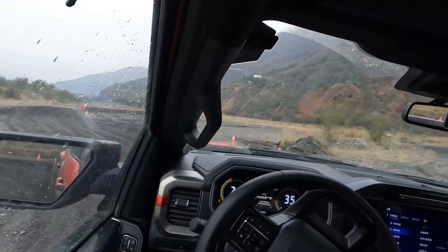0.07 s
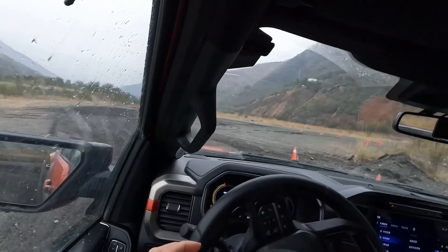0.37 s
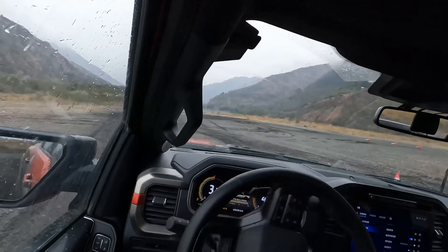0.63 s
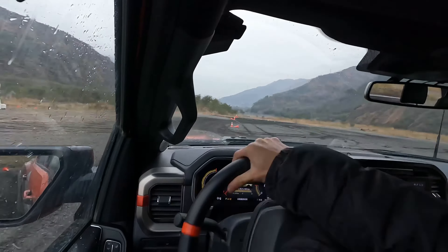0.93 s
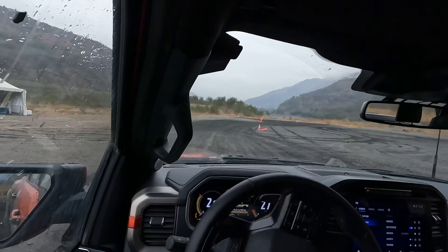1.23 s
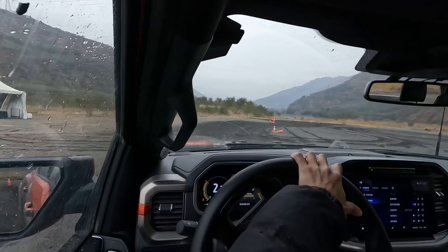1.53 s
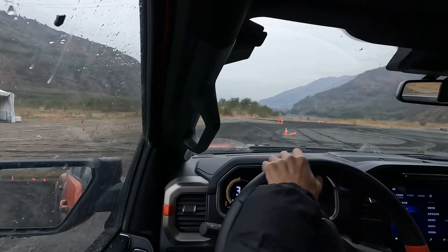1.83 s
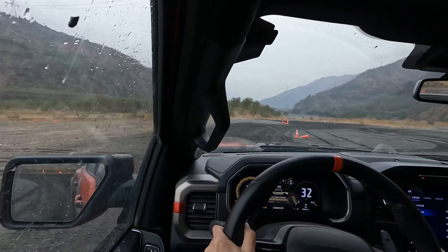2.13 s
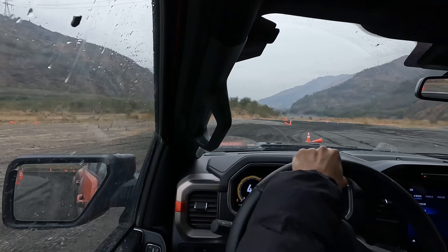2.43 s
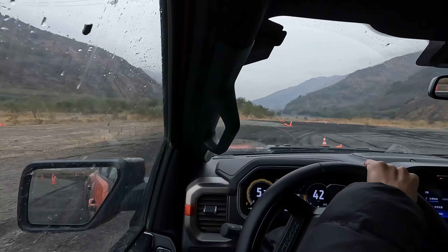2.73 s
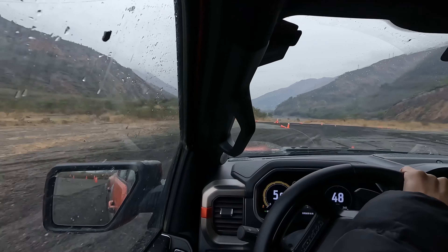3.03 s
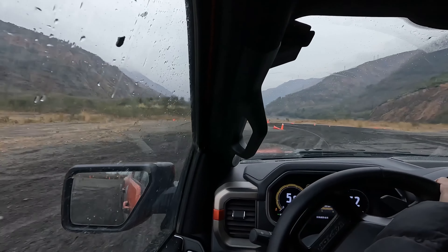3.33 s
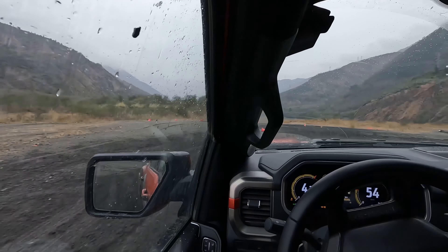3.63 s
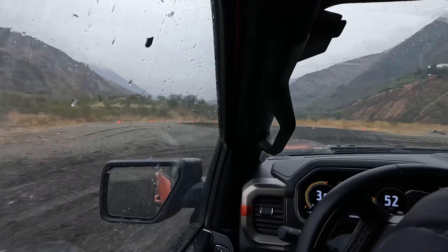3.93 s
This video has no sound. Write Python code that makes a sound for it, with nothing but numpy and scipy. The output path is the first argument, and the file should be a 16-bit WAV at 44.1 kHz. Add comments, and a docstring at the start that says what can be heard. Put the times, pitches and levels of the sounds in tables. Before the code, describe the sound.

Inside the cabin, a hard-driven truck engine dips, climbs to high revs and falls back with a shift. Rough ground booms below it, with a few suspension thumps, faint wet grit spraying and stones knocking in the wheel wells.

```python
"""A six-cylinder truck engine, heard from inside as it is driven hard over loose wet gravel.
Its firing cylinders make a stack of notes that pulls, sags in a turn, revs up and drops at a shift.
Under it, rough ground makes the cabin boom and the tires rumble, and ruts thump the suspension.
Wet grit sprays the underside, pebbles tick, stones clatter, and one cracks against the body."""
import sys
import numpy as np
from scipy import signal
from scipy.fft import rfft, irfft
from scipy.io import wavfile
from scipy.ndimage import uniform_filter1d, minimum_filter1d

SR = 44100
rng = np.random.default_rng(int(sys.argv[2]) if len(sys.argv) > 2 else 0)


def transcribe(signal):
    """Save signal, clipped to [-1, 1], as a 16-bit WAV file at the path in sys.argv[1]."""
    frames = np.atleast_2d(signal).T
    limited = np.clip(frames, -1, 1)
    pcm = np.round(limited * 32767).astype(np.int16)
    wavfile.write(sys.argv[1], SR, pcm)


N = 176400
T = np.arange(N) / SR


def amp(db):
    """Turns decibels into a gain."""
    return 10 ** (np.asarray(db) / 20)


def unit(x):
    """Scales a sound to an average (rms) level of 1."""
    return x / np.sqrt(np.mean(x ** 2) + 1e-20)


def curves(table):
    """Joins the rows of a timed table with straight lines, one curve per column."""
    times, *columns = np.transpose(table)
    return [np.interp(T, times, column) for column in columns]


def colour(x, points):
    """Makes some frequencies stronger than others; the result has level 1."""
    octave = np.log2(np.fft.rfftfreq(len(x), 1 / SR) + 1)
    hz, db = np.transpose(points)
    return unit(irfft(rfft(x) * amp(np.interp(octave, np.log2(hz), db)), len(x)))


def band(x, centre_hz, octaves):
    """Keeps a bell-shaped band of frequencies; the result has level 1."""
    hz = np.fft.rfftfreq(len(x), 1 / SR) + 1
    bell = np.exp(-.5 * (np.log2(hz / centre_hz) / octaves) ** 2)
    return unit(irfft(rfft(x) * bell / np.sqrt(hz), len(x)))


def drift(hz):
    """A random wobble, up to about hz times a second."""
    f = np.fft.rfftfreq(N, 1 / SR)
    return unit(irfft(rfft(rng.standard_normal(N)) * np.exp(-(f / hz) ** 2), N))


def ring(tones, t):
    """A struck part rings with a few tones that die away."""
    return sum(amp(db) * 1000 ** (-t / fade_s) * np.sin(2 * np.pi * (hz * t + rng.random()))
               for hz, db, fade_s in tones)


def add(mix, start, sound):
    """Mixes a sound in at a start time in seconds."""
    part = mix[max(round(start * SR), 0):][:len(sound)]
    part += sound[:len(part)]


# Noise from the ground. Each row: time in seconds, relative boom and rumble levels in dB.
ROAD_LEVELS = [(0.0, -17.5, -30), (0.34, -17.5, -27.5), (0.4, -15, -33.5), (0.58, -29, -21.5),
               (0.66, -15, -27.5), (1.4, -22.5, -28), (1.86, -27.5, -30), (2.72, -16.5, -28),
               (2.85, -17.5, -24.5), (4.0, -29, -38)]
# The tone of the boom and of the rumble. Each row: frequency in Hz, relative level in dB.
BOOM_TONE = [(4, -39.5), (22, 4.5), (35, -7.5), (48, -12.5), (90, -46), (300, -102.5)]
RUMBLE_TONE = [(20, -26), (48, 1.5), (72, 5), (110, -2.5), (160, -7), (230, -10), (320, -17.5), (450, -29),
               (700, -37.5), (2000, -81.5)]
def road():
    """Rough ground shakes the cabin air and rumbles through the tires."""
    boom_db, rumble_db = curves(ROAD_LEVELS)
    boom = amp(boom_db + 7) * colour(rng.standard_normal(N), BOOM_TONE)
    rumble = amp(rumble_db + 2.5) * colour(rng.standard_normal(N), RUMBLE_TONE)
    return boom + rumble


def grains(per_second=1500, spread_db=2.5, click_share=0.33):
    """Countless small hits of uneven size over a smooth hiss."""
    size = amp(spread_db * np.minimum(rng.exponential(1, N), 4))
    clicks = size * rng.choice([-1, 1], N) * (rng.random(N) < per_second / SR)
    return np.sqrt(click_share) * unit(clicks) + np.sqrt(1 - click_share) * rng.standard_normal(N)


# Gravel under the tires. Each row: time in seconds, relative crunch and grit levels in dB.
GRAVEL_LEVELS = [(0.03, -58.5, -65), (0.45, -55.5, -60.5), (0.53, -51.5, -56.5), (0.67, -51, -53.5),
                 (0.87, -46, -50), (1.08, -50, -53.5), (1.6, -60, -63), (1.97, -58, -64), (2.15, -53, -59),
                 (2.45, -48.5, -60), (2.79, -52, -57.5), (3.1, -53, -60.5), (3.58, -59, -64.5),
                 (3.8, -60.5, -69.5), (3.97, -67.5, -75)]
# The tone of each gravel layer. Each row: frequency in Hz, relative level in dB.
CRUNCH_TONE = [(100, -15), (300, 5), (450, 8), (600, 1), (780, 1), (1400, -8), (2000, -19.5), (5000, -43.5)]
GRIT_TONE = [(500, -31.5), (1200, 2.5), (2100, 1.2), (4100, -5.5), (5200, -8.5), (8000, -17.5),
             (14000, -52.5)]
SPRAY_TONE = [(2000, -26), (4500, -2.5), (6700, -0.5), (8500, -4), (11000, -12), (12500, -4.5),
              (15500, -23)]
def gravel():
    """Coarse crunch, finer grit and wet spray, all arriving in the same clumps."""
    crunch_db, grit_db = curves(GRAVEL_LEVELS)
    clumps = amp(1.56 * drift(hz=29))
    crunch = amp(crunch_db + 4) * colour(grains(), CRUNCH_TONE)
    grit = amp(grit_db + 0.5) * colour(grains(), GRIT_TONE)
    spray = amp(grit_db - 12) * colour(grains(), SPRAY_TONE)
    return clumps * (crunch + grit + spray)


# Sheets of wet gravel. Each row: start and length in seconds, level in dB, centre in Hz,
# width in octaves.
FLUNG_SHEETS = [(0.253, 0.06, -51, 6000, 1), (0.651, 0.1, -53.5, 4380, .9), (0.959, 0.092, -52, 5500, 0.55),
                (0.946, 0.072, -59, 12800, 0.12), (1.169, 0.086, -45.5, 1080, 0.81),
                (1.383, 0.11, -64.5, 6500, 0.61), (1.93, 0.28, -63.5, 4970, 0.8),
                (2.835, 0.071, -59, 4500, 0.84), (2.942, 0.055, -61, 5500, 0.62)]
def flings():
    """The tread throws gravel at the wheel wells in brief swells."""
    out = np.zeros(N)
    for start, length, db, centre_hz, octaves in FLUNG_SHEETS:
        swell = np.hanning(round(length * SR))
        patter = band(grains()[:SR // 2], centre_hz, octaves)
        add(out, start, amp(db) * swell * patter[:len(swell)])
    return out


# Pebble hits. Each row: start in seconds, level in dB, centre in Hz, width in octaves.
PEBBLE_HITS = [(0.111, -58, 4000, 0.67), (.158, -52, 2490, 0.8), (0.254, -45.5, 1640, 0.71),
               (.459, -55.5, 2123, 0.15), (.517, -49, 1970, 1.0), (.556, -56, 4900, 0.53),
               (.748, -43.5, 1970, 0.63), (.793, -44.5, 4200, 0.72), (0.891, -48, 2243, 0.16),
               (.973, -52, 6660, 0.061), (1.008, -58, 5350, .12), (1.402, -49.5, 1797, 0.58),
               (1.515, -55.5, 2730, 0.88), (2.087, -52, 2039, 0.26), (2.645, -54.5, 2400, 0.55),
               (2.803, -49, 700, .4), (3.334, -55, 2940, 0.68)]
def pebbles(peak_s=.006):
    """Pebbles tick on the underside, each with a soft attack."""
    out, t = np.zeros(N), T[:SR // 10]
    envelope = t / peak_s * np.exp(1 - t / peak_s)
    for start, db, centre_hz, octaves in PEBBLE_HITS:
        add(out, start, amp(db) * envelope * band(rng.standard_normal(len(t)), centre_hz, octaves))
    return out


# Stones hitting a wheel well. Each row: start in seconds, level in dB.
RATTLE_HITS = [(.801, -33), (1.074, -44.5), (1.098, -41), (1.213, -42), (2.213, -35.5), (2.23, -36.5),
               (2.281, -42.5), (2.326, -44), (2.366, -42), (2.525, -45), (2.558, -39.5), (2.87, -44.5)]
# The tone of the wheel well. Each row: frequency in Hz, relative level in dB.
WELL_TONE = [(300, -11), (750, 7), (1050, 0.5), (1500, -1), (1850, -13), (6000, -39.5)]
def rattles(rise_s=.0004, decay_s=.01):
    """Larger stones clatter in a wheel well, each with the same hollow tone."""
    out, t = np.zeros(N), T[:SR // 10]
    envelope = np.minimum(t / rise_s, 1) * np.exp(-t / decay_s)
    for start, db in RATTLE_HITS:
        add(out, start, amp(db) * envelope * colour(rng.standard_normal(len(t)), WELL_TONE))
    return out


# The tone of the crack. Each row: frequency in Hz, relative level in dB.
CRACK_TONE = [(400, 5), (4200, -3), (5200, -8), (8000, -18), (10300, -14), (13500, -29), (15500, -30)]
# The ringing panel. Each row: pitch in Hz, relative level in dB, seconds to fade by 60 dB.
PANEL_RING = [(450, -5, .025), (560, -11, .08), (730, 1, .03), (1400, -7.5, .024), (2100, -1.5, .025),
              (2751, -16, .045), (3370, -5, .025), (3900, -4, .015), (6702, -28, .13)]
def stone(start=.2811, db=-26.5, rise_s=.0004, decay_s=.0022, cabin_decay_s=.014):
    """One stone cracks against a near panel, which rings briefly into the cabin."""
    out, t = np.zeros(N), T[:SR // 4]
    fade = np.exp(-t / decay_s) + amp(-25) * np.exp(-t / cabin_decay_s)
    crack = fade * colour(rng.standard_normal(len(t)), CRACK_TONE)
    add(out, start, amp(db) * np.minimum(t / rise_s, 1) * (crack + ring(PANEL_RING, t)))
    return out


# Ruts in the road. Each row: start in seconds, relative level in dB.
RUTS = [(.495, -15.5), (.805, -19.5), (.87, -24.5), (2.215, -22.5)]
# The ringing frame. Each row: pitch in Hz, relative level in dB, seconds to fade by 60 dB.
FRAME_RING = [(157, 5.5, 0.17), (231, -1.5, 0.15), (328.3, -10.5, 0.14), (398.6, -10.5, 0.11),
              (541, -17, 0.11)]
def thumps(rise_s=.004):
    """Ruts knock the suspension and set the truck's frame ringing."""
    out, t = np.zeros(N), T[:SR // 4]
    for start, db in RUTS:
        add(out, start, amp(db) * np.minimum(t / rise_s, 1) * ring(FRAME_RING, t))
    return out


# Engine speed. Each row: time in seconds, firings per second of one bank of three cylinders.
ENGINE_SPEED = [(0.0, 70.77), (0.15, 72.5), (0.73, 88.03), (0.86, 77.53), (1.01, 55.98), (1.11, 50.07),
                (1.3, 48.5), (1.45, 54.36), (1.68, 76.34), (1.8, 91.32), (2.33, 111), (2.84, 146.1),
                (3.05, 150.5), (3.19, 146), (3.28, 129.3), (3.4, 113.3), (3.55, 100), (4.0, 96.3)]
# The note of all six cylinders firing. Each row: time in seconds, level in dB.
FIRING_LEVEL = [(0, -32), (.18, -25.5), (.35, -29), (.65, -26.5), (.9, -29), (1.07, -23.5), (1.12, -33),
                (1.39, -35), (1.47, -22.5), (1.62, -30.5), (1.7, -22), (1.77, -35), (1.83, -27.5),
                (2.2, -34), (2.63, -25), (2.73, -43), (2.97, -32.5), (3.19, -37.5), (3.35, -22.5),
                (3.75, -40.5), (4.0, -60.5)]
# The exhaust note of one bank, an octave lower. Each row: time in seconds, level in dB.
BANK_LEVEL = [(0, -52.5), (1.72, -40), (1.88, -24.5), (2.55, -26), (2.72, -33), (2.98, -24), (3.2, -30.5),
              (3.33, -21), (3.7, -40)]
# Weaker notes from uneven cylinders. Each row: multiple of the cycle rate, relative level in dB.
WEAK_NOTES = [(4, -1), (5, -9), (7, -6.5), (8, -10.5), (10, -13.5), (11, -17), (12, -23.5), (14, -24),
              (15, -26.5), (18, -30.5)]
# How hard the engine pulls. Each row: time in seconds, relative level of the weaker notes in dB.
ENGINE_PULL = [(0, -43.5), (.7, -36.5), (1.1, -28.5), (1.7, -36.5), (2.3, -29), (2.55, -30.5),
               (2.72, -36.5), (3.0, -34), (3.4, -37.5), (3.9, -53.5)]
# How the cabin shapes the upper and weaker notes. Each row: frequency in Hz, boost or cut in dB.
CABIN_TONE = [(245, -3.5), (290, -7.5), (320, -2), (345, -5.5), (370, 2.5), (408, -11.5), (455, 1),
              (490, -1), (600, -14), (745, 5.5), (900, -15)]
def engine(stumble=0.0064, steady_hz=97, flutter_hz=29.5, flutter_db=0.17, weak_flutter_db=4.5):
    """Three strong notes and many weaker ones follow the crankshaft, which stumbles at low speed."""
    bank_hz, firing_db = curves(ENGINE_SPEED) + curves(FIRING_LEVEL)
    bank_db, pull_db = curves(BANK_LEVEL) + curves(ENGINE_PULL)
    cycle_hz = bank_hz / 3  # each cylinder fires once per cycle
    wobble = stumble * (steady_hz / bank_hz) ** 2 * drift(hz=29.3)
    cycles = np.cumsum(cycle_hz * (1 + wobble)) / SR
    cabin_db = lambda multiple: np.interp(multiple * cycle_hz, *np.transpose(CABIN_TONE))
    upper_db = firing_db - 10 + cabin_db(9)
    levels = [(3, bank_db), (6, firing_db), (9, upper_db)]
    for multiple, db in WEAK_NOTES:
        flicker_db = weak_flutter_db * drift(flutter_hz)
        levels.append((round(multiple), pull_db + db + cabin_db(multiple) + flicker_db))
    notes = sum(np.sqrt(2) * amp(db) * np.sin(2 * np.pi * (multiple * cycles + rng.random()))
                for multiple, db in levels)
    return amp(flutter_db * drift(flutter_hz)) * notes


def scene():
    """Everything as heard from the driver's seat, in one channel."""
    return (engine() + road() + gravel() + flings() + pebbles() + rattles() + stone() + thumps())[None]


def limit(x, ceiling_db, hold_s):
    """Turns the volume down smoothly around peaks above a ceiling."""
    span = max(round(hold_s * SR), 2)
    gain = minimum_filter1d(np.minimum(1, amp(ceiling_db) / (abs(x) + 1e-9)), span)
    return x * uniform_filter1d(uniform_filter1d(gain, span // 2), span // 2)


def record(dry, bass_hz=53.4, top_hz=15600):
    """Holds down peaks in the boom, then in the whole sound, and cuts the highest treble."""
    bass = irfft(rfft(dry) / (1 + (np.fft.rfftfreq(N, 1 / SR) / bass_hz) ** 4), N)
    held_bass = limit(bass, ceiling_db=-12, hold_s=.03)
    held = limit(dry - bass + held_bass, ceiling_db=-7, hold_s=.0091)
    treble_cut = signal.firwin(511, top_hz, window=("kaiser", 9), fs=SR)
    return signal.oaconvolve(held, treble_cut[None], "same")


dry = scene()
out = record(dry)
transcribe(out)
```